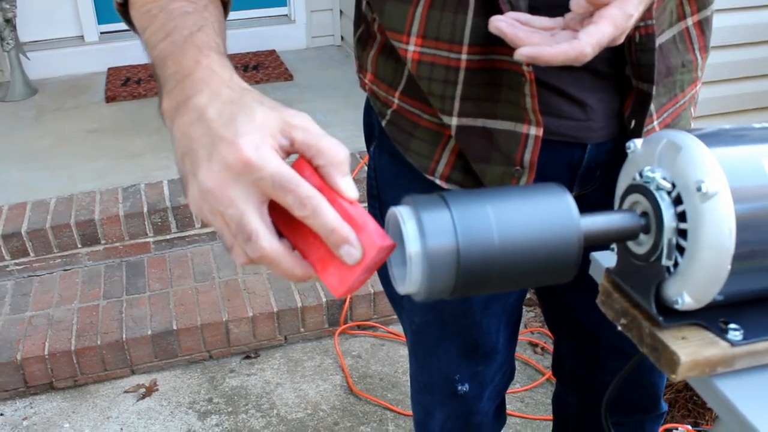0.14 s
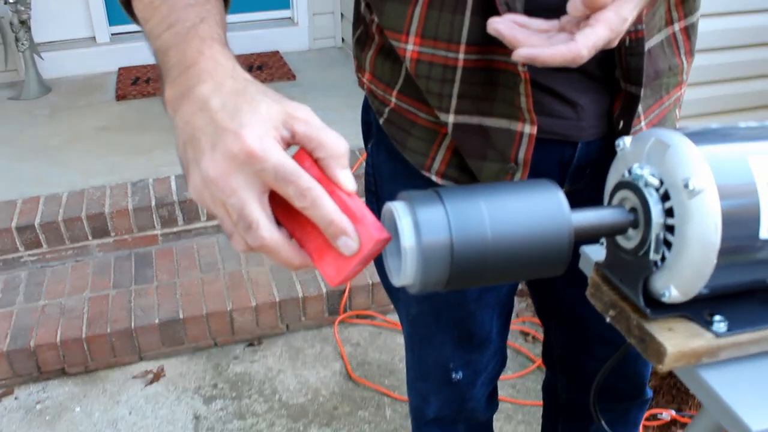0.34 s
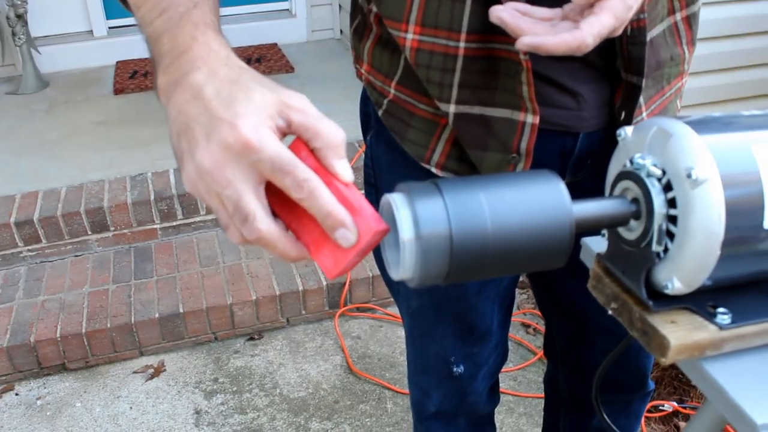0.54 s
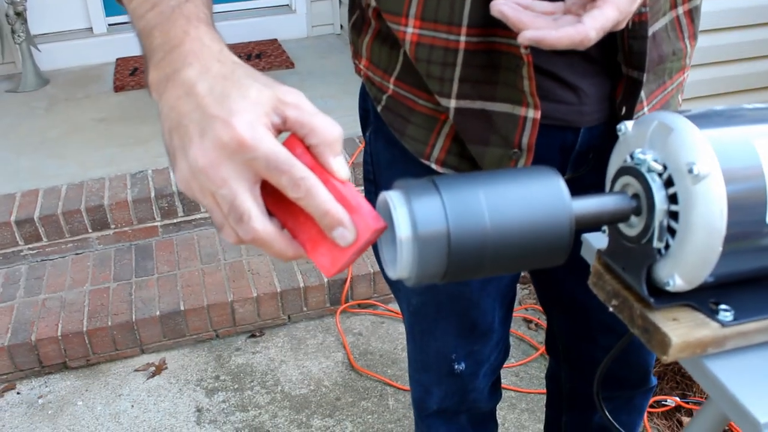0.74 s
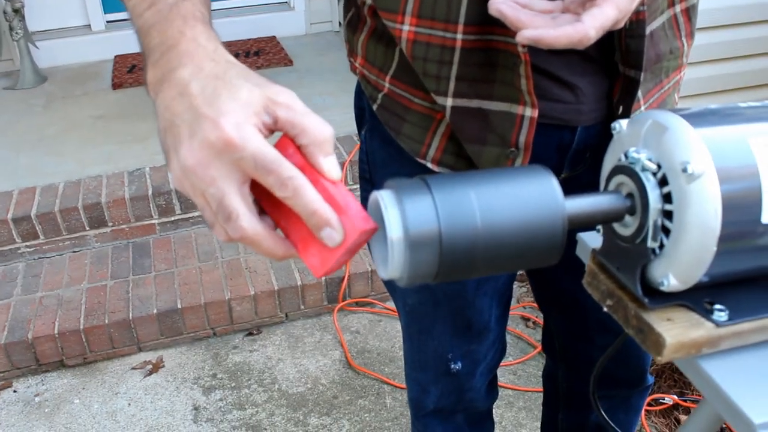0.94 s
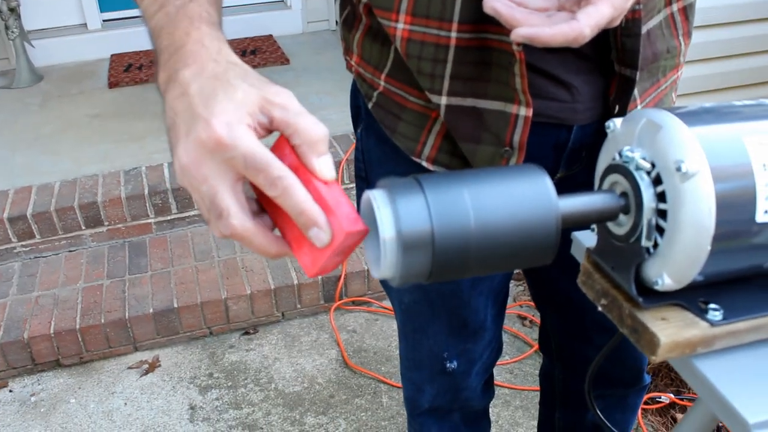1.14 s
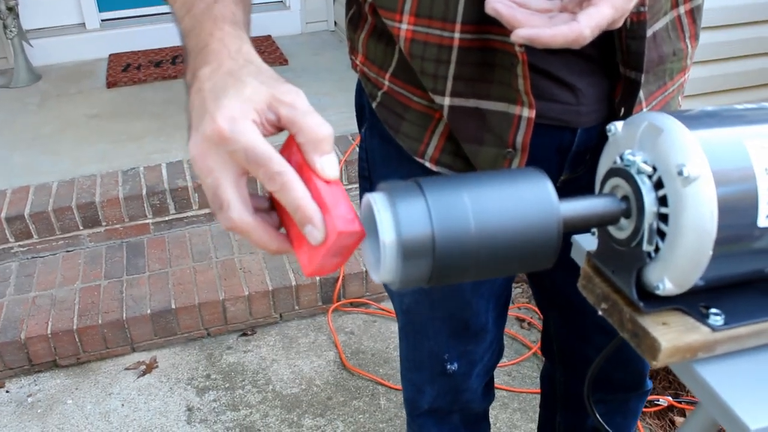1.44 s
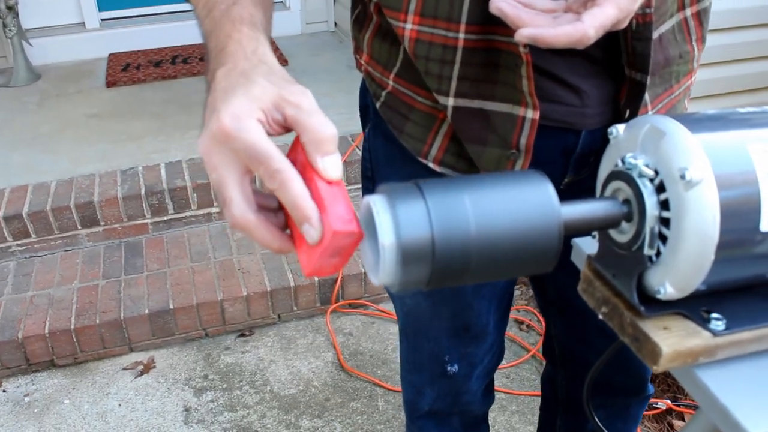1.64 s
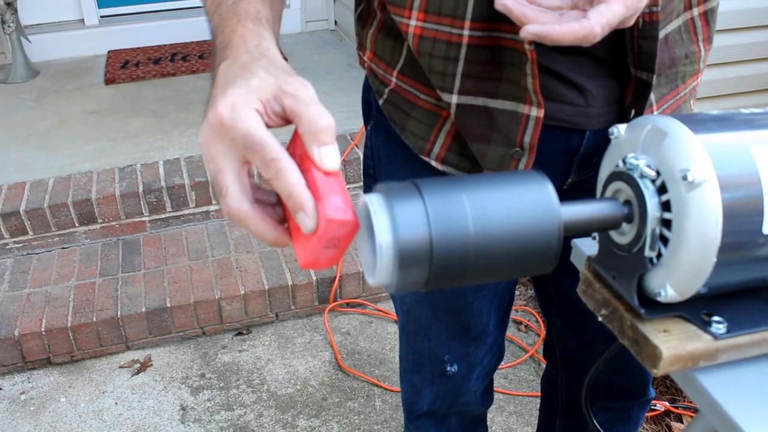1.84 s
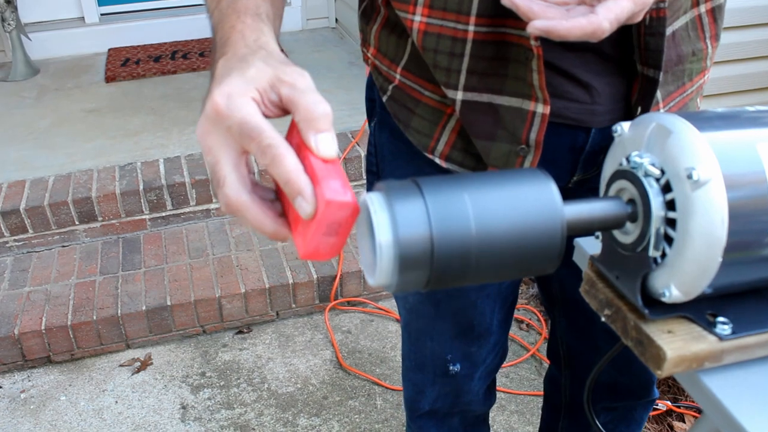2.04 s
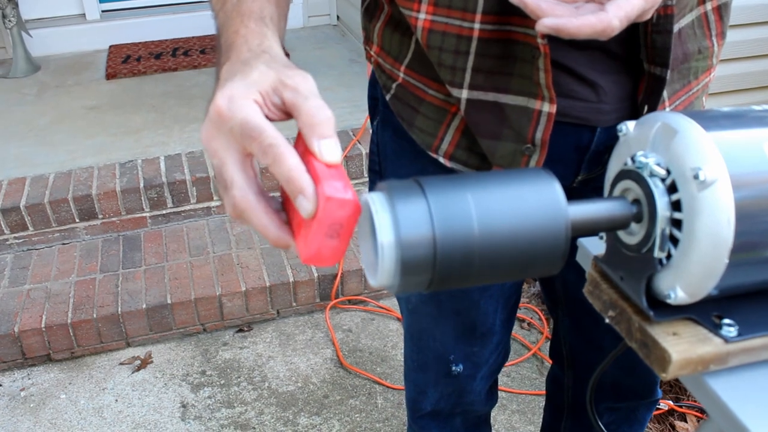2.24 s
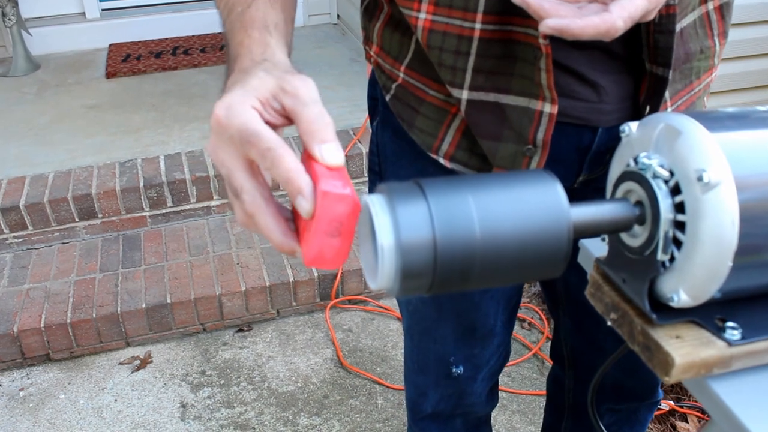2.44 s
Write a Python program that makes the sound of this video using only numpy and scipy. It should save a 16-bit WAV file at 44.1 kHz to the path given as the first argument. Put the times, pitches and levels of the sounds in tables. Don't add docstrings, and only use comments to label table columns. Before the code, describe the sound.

A wet abrasive pad grinds continuously on a spinning glass bottle rim, a bright gritty hiss pulsing about thirty times a second, with small ticks, catches and faint motor hum, close outdoors, one microphone.

```python
import sys
import numpy as np
from scipy import signal
from scipy.fft import rfft, irfft
from scipy.io import wavfile

SR = 44100
rng = np.random.default_rng(int(sys.argv[2]) if len(sys.argv) > 2 else 0)


def file_out(sig):
    cols = np.atleast_2d(sig).T
    lim = np.clip(cols, -1, 1)
    pcm = np.round(lim * 32767).astype(np.int16)
    wavfile.write(sys.argv[1], SR, pcm)


def linear_from_db(decibels):
    return 10 ** (np.asarray(decibels, float) / 20)


N = 114660

# multiple of the turn, level in dB before the pad tilts, level in dB after.
HUM = [(3, -67, -54), (4, -66, -69), (5, -61, -60.5), (6, -48, -60), (8, -65, -52), (10, -50, -48),
       (16, -43.5, -40.5)]
# start in seconds, level in dB.
KNOCKS = [
    (2.4215, -11),
    (2.5555, -15),
]
# start in seconds, low ring in dB, high ring in dB.
TICKS = [(0.0682, -16, -20), (0.0997, -16, -18), (0.1331, -19, -22), (0.167, -20, -22), (0.1999, -18, -22),
         (0.3132, -19, -22), (0.377, -20, -19), (0.41, -17, -17), (0.4444, -17, -18), (0.4778, -20, -21),
         (0.5107, -17, -20), (0.6454, -11, -14), (0.6784, -17, -19), (0.7108, -17, -20), (0.7457, -14, -17),
         (0.7791, -13, -17), (0.8126, -15, -18), (0.846, -16, -21), (0.8799, -14, -21), (0.9128, -14, -18),
         (0.9467, -15, -18), (0.9772, -21, -20), (1.0026, -21, -21), (1.0809, -16, -16), (1.1139, -17, -15),
         (1.1458, -20, -15), (1.1817, -18, -15), (1.2111, -18, -17), (1.3154, -17, -15), (1.3478, -15, -17),
         (1.3798, -16, -19), (1.5584, -16, -21), (1.6147, -16, -22), (1.6806, -16, -22), (1.7135, -14, -21),
         (1.8502, -21, -23), (1.9794, -20, -27), (2.0123, -17, -26), (2.0792, -20, -25), (2.2189, -20, -22),
         (2.2493, -20, -23), (2.4448, -16, -24), (2.4823, -16, -26), (2.5561, -21, -24)]
# pitch in Hz, level in dB, decay by 60 dB in seconds.
CHIP_LOW = [(2430, 1.5, .02), (2850, -5, .012)]
# pitch in Hz, level in dB, decay by 60 dB in seconds.
CHIP_HIGH = [(3490, -3, .03), (4024, 0, .025), (4400, 0, .03), (5830, -6, .017)]
# start in seconds, level in dB.
THUMPS = [(0.029, -34), (0.052, -31), (0.144, -22), (0.183, -17.5), (0.243, -19.5), (0.278, -19),
          (0.312, -20.5), (0.348, -23), (0.38, -23), (0.447, -23), (0.523, -22.5), (0.638, -35),
          (0.686, -18.5), (0.72, -18), (0.754, -15), (0.788, -14.5), (0.821, -18), (0.854, -23),
          (0.89, -24.5), (1.039, -18.5), (1.079, -21), (1.25, -20), (1.316, -25.5), (1.35, -25),
          (1.389, -19), (1.447, -29), (1.591, -23.5), (1.625, -16), (1.657, -20.5), (1.691, -21.5),
          (1.762, -27), (1.933, -30), (2.091, -21), (2.132, -32), (2.423, -13.5), (2.558, -21)]
# time in seconds, level in dB.
COVER = [(0.0, -28.5), (0.4, -28), (0.69, -27), (0.76, -29.5), (1.45, -31.5), (1.76, -30), (1.92, -32.5),
         (2.6, -42)]
# time in seconds, pitch in Hz, level in dB.
NECK = [(0, 1680, -35), (.12, 1720, -34), (.45, 1710, -38.5), (.63, 1650, -30.5), (.78, 1590, -34.5),
        (.95, 1610, -35.5), (1.2, 1650, -33), (1.36, 1660, -38.5), (1.48, 1640, -28.5), (1.57, 1660, -41),
        (1.9, 1640, -40), (1.93, 1640, -33), (1.96, 1640, -41), (2.25, 1680, -36.5), (2.6, 1670, -47)]
# centre in Hz, width in Hz, level in dB.
AIR = [(292, 31, -15.5), (464, 175, -14.5), (656.7, 98, -5), (1680, 200, -10)]
# frequency in Hz, level in dB per Hz.
AIR_FLOOR = [(40, -87), (100, -36), (250, -24.5), (600, -14.5), (800, -21.5), (1200, -19.5), (2200, -18.5),
             (4000, -30.5)]
# centre in Hz, width in Hz, level in dB.
WALL = [(5796, 67, 7.5), (6025, 50, 8.5), (6083, 180, 4.5)]
# frequency in Hz, level in dB per Hz.
FINE = [(2500, -43), (5500, -28), (7500, -1.5), (9000, -10.5), (10000, -16), (11700, -16), (14000, -10),
        (16000, -40)]
# centre in Hz, width in Hz, level in dB.
FINE_GLASS = [(6880, 140, 0.5), (7260, 110, -17), (8250, 165, 3.5), (9130, 170, -1.5), (10480, 710, -8.5),
              (12600, 180, 2.5), (13110, 215, 5), (13960, 410, -11), (14640, 400, -4)]
# centre in Hz, width in Hz, level in dB.
TOP_GLASS = (15620, 260, -1)
# frequency in Hz, level in dB per Hz.
SCRAPE = [(250, -44), (900, -28), (1950, -14), (2800, -6.5), (4000, -1.5), (5300, -8.5), (6500, -26.5),
          (10000, -77)]
# centre in Hz, width in Hz, level in dB.
GLASS = [
    [(2450, 140, -3.5), (2760, 55, -18), (3180, 50, 0.5), (3460, 60, 0.5), (3700, 50, -3), (4040, 26, 9),
     (4364, 83, 5), (4870, 72, 0.5)],
    [(2340, 270, -3), (3160, 120, -2), (3500, 42, -12.5), (4010, 40, 3), (4375, 140, 5)],
    [(2380, 72, -8), (2660, 60, 0), (2960, 60, 2), (3400, 120, -0.5), (4290, 63, 9)],
]
# time in seconds, pressure as scrape level in dB, air-column drive in dB,
# wobble per turn in dB, share of grit repeating 0-1, wall ring in dB, fine-grit share in dB.
HAND = [(0, -24, -25.5, -7, 0.6, -10, -3), (.1, -27.5, -29.5, 6.5, 1, -9.5, -5.5),
        (.2, -28.5, -25.5, 1, 1, -6.5, -2), (.36, -22.5, -26.5, 2, 1, -9.5, -6.5),
        (.45, -22.5, -26, 1.5, 0.95, -6, -4), (.62, -22, -29, 2.5, 1, -2.5, -1.5),
        (.7, -20.5, -32, -1.5, 0.36, -8, -6.5), (.93, -23, -28.5, 2, 1, -6.5, -5),
        (1.2, -24.5, -28, 1, 0.73, -4, -3.5), (1.33, -21, -27, 1, 0.74, 0, -5),
        (1.55, -20.5, -27, 0, 0.9, -8, -7.5), (1.7, -26, -26.5, 1.5, 0, -4, -5),
        (1.76, -28, -25.5, 2.5, 0.04, -7.5, -6), (2.2, -26.5, -27.5, 0, 0.6, -7.5, -6.5),
        (2.45, -27, -27.5, 3, 0.85, -6.5, -8), (2.53, -35, -28, -0.5, 0, -4, -2.5),
        (2.6, -26.5, -26, 4, 0.2, -7, -6)]
# start in seconds, peak in dB, thump of the air column in dB,
# length in seconds.
CATCHES = [(0.058, -6, -5, 0.018), (0.094, -2.5, 1, 0.01), (0.132, -2, -18, 0.0077),
           (0.164, -7, -24, 0.014), (0.195, -4, -11, 0.015), (0.2316, -2.5, -18, 0.019),
           (0.416, -6, -15, 0.013), (0.438, -1.5, -17, 0.014), (0.6326, 0.5, -7, 0.019),
           (0.766, -4, -20, 0.023), (1.04, 0, -16, 0.008), (1.173, -0.5, -32, 0.01), (1.21, -18, 8, 0.0092),
           (1.347, 5, -17, 0.0057), (1.679, -8.5, 1, 0.014), (2.213, -4.5, 1.5, 0.0088),
           (2.258, -1, 1, 0.0054), (2.278, -4.5, -0.5, 0.011), (2.44, -11, 2, 0.011),
           (2.547, -7, -8, 0.0092), (2.588, -13, -4, 0.0073)]

TURN_HZ = 29.878
TILT_S, TILT_TAKES_S = 1.6, 0.13
HIGH_SPOT_TURN, AIR_SPOT_TURN = 0.22, 0.42
FLUTTER_DB, FLUTTER_HZ = 0.8, 14


def drift(rate_hz):
    r = np.exp(-80 * np.pi * rate_hz / SR)
    slow = signal.lfilter([1], [1, -2 * r, r * r], rng.standard_normal(N // 40 + 2002))[2000:]
    return np.interp(np.arange(N) / 40, np.arange(len(slow)), rms_one(slow))


def rms_one(x):
    return x / np.sqrt(np.mean(x ** 2) + 1e-20)


def columns(rows):
    s, *rest = np.transpose(rows)
    return [np.interp(np.arange(N) / SR, s, c) for c in rest]


def body(x, modes, floor):
    size = 2 ** 13
    hz = np.arange(1, size // 2 + 2) * SR / size
    floor_hz, floor_db = np.transpose(floor)
    power = linear_from_db(2 * np.interp(np.log(hz), np.log(floor_hz), floor_db))
    for centre_hz, width_hz, db in modes:
        detune = (hz - centre_hz ** 2 / hz) / width_hz
        power = power + linear_from_db(2 * db) / (1 + detune ** 2) ** 1.31
    cepstrum = irfft(np.log(power) / 2)
    cepstrum[1:size // 2] *= 2
    cepstrum[size // 2 + 1:] = 0
    response = irfft(np.exp(rfft(cepstrum)))
    return signal.fftconvolve(x, response / np.sqrt(np.sum(response ** 2)))[:N]


def sung(hz, width_hz):
    evenness = 0.85
    wander = drift(width_hz) + 1j * drift(width_hz)
    steadied = wander / (np.abs(wander) + 0.1) ** evenness
    ring = steadied * np.exp(2j * np.pi * np.cumsum(hz * np.ones(N)) / SR)
    return rms_one(ring.real)


def strike(starts_s, levels_db, modes):
    at = (np.array(starts_s) * SR).astype(int)
    out = np.zeros(N)
    for hz, db, t60 in modes:
        hits = np.zeros(N)
        hits[at] = linear_from_db(levels_db + db + rng.standard_normal(len(at)))
        r, w = linear_from_db(-60 / (t60 * SR)), 2 * np.pi * hz / SR
        soft = np.hanning(round(4 * SR / hz))
        push = np.convolve(hits, soft * np.cos(w * np.arange(len(soft))) * 2 / soft.sum())[:N]
        out += signal.lfilter([0, np.sin(w)], [1, -2 * r * np.cos(w), r * r], push + 1e-18)
    return out


def tilted():
    return np.clip((np.arange(N) / SR - TILT_S) / TILT_TAKES_S, 0, 1)


def bench():
    before_db, after_db = -54, -47.5
    colour = [(30, -13), (90, -3), (200, 3), (400, -18.5)]   # Hz, dB per Hz
    return linear_from_db(before_db + (after_db - before_db) * tilted()) * body(rng.standard_normal(N), [], colour)


def shaft():
    t, after = np.arange(N) / SR, tilted()
    hum = np.zeros(N)
    for multiple, before_db, after_db in HUM:
        level_db = before_db + (after_db - before_db) * after + 0.8 * drift(4.1)
        hum += np.sqrt(2) * linear_from_db(level_db) * np.sin(2 * np.pi * (multiple * TURN_HZ * t + rng.random()))
    return hum


def knocks():
    starts_s, levels_db = np.transpose(KNOCKS)
    modes = [(649, -17.5, 0.08), (1640, -9.5, 0.081), (1770, -3, 0.04), (4530, -14, 0.022), (6160, -12, 0.061)]
    return strike(starts_s, levels_db, modes)


def chip_ticks():
    starts_s, low_db, high_db = np.transpose(TICKS)
    return strike(starts_s, low_db, CHIP_LOW) + strike(starts_s, high_db, CHIP_HIGH)


def grit(grainy):
    grains_per_s, spread_db = 4000, 3.5
    cracks = rng.random(N) < grains_per_s / SR
    sizes = linear_from_db(spread_db * np.minimum(rng.exponential(1, N), 5))
    grains = cracks * sizes * rng.choice([-1, 1], N)
    share = 0.45 * grainy
    return np.sqrt(share) * rms_one(grains) + np.sqrt(1 - share) * rng.standard_normal(N)


def rim(repeat, grainy=1):
    memory, memory_hz = 0.8, 7000
    turn = round(SR / TURN_HZ)
    worn, fresh = grit(grainy), grit(grainy)
    for i in range(turn, N, turn):
        part = worn[i:i + turn]
        worn[i:i + turn] = memory * worn[i - turn:i][:len(part)] + np.sqrt(1 - memory ** 2) * part
    low = signal.butter(1, memory_hz, fs=SR, output="sos")
    swap = np.sqrt(repeat) * worn - (1 - np.sqrt(1 - repeat)) * fresh
    return fresh + signal.sosfilt(low, swap)


def throb(depth_db, spot_turn):
    squareness, second_spot = 1.7, 0.067
    angle = 2 * np.pi * (TURN_HZ * np.arange(N) / SR - spot_turn)
    shape = np.tanh(squareness * np.cos(angle)) + second_spot * np.sin(2 * angle)
    return linear_from_db(depth_db * shape + 1.0 * drift(18))


def catches(levels_db):
    attack_s, trim_db = 0.0037, -16.5
    since, power = np.arange(SR // 20) / SR, np.zeros(N + SR)
    for (start_s, _, _, length_s), db in zip(CATCHES, levels_db):
        swell = (1 - np.exp(-since / attack_s)) * np.exp(-(since / length_s) ** 2)
        power[int(start_s * SR):][:len(since)] += linear_from_db(2 * (db + trim_db)) * swell
    return power[:N]


def air_column():
    rise_s, fall_s, thump_db = 0.006, 0.0065, 4
    since, power = np.arange(SR // 10) / SR, np.zeros(N + SR)
    swell = (1 - np.exp(-since / rise_s)) * np.exp(-since / fall_s)
    for start_s, db in THUMPS:
        power[int(start_s * SR):][:len(since)] += linear_from_db(2 * (db + thump_db)) * swell ** 2
    cover_db = columns(COVER)[0] - 3
    column = np.sqrt(linear_from_db(2 * cover_db) + 4 * power[:N]) * sung(655, 26)
    neck_hz, neck_db = columns(NECK)
    neck = linear_from_db(neck_db) * throb(4, AIR_SPOT_TURN) * sung(neck_hz, 70)
    return column + neck


def air_puffs(air_db, wobble_db, repeat):
    _, peak_db, thump_db, _ = np.transpose(CATCHES)
    steady = linear_from_db(air_db) * throb(0.33 * wobble_db, AIR_SPOT_TURN)
    drive = np.sqrt(steady ** 2 + catches(peak_db + thump_db - 3))
    return body(drive * rim(0.5 * repeat), AIR, AIR_FLOOR)


def wall_ring(eased, wall_db, repeat):
    drive = linear_from_db(wall_db + FLUTTER_DB * drift(FLUTTER_HZ)) * eased
    return body(drive * rim(0.14 * repeat), WALL, [(100, -21), (20000, -73)])


def fine_scrape(eased, fine_db, repeat):
    drive = linear_from_db(fine_db + FLUTTER_DB * drift(FLUTTER_HZ)) * eased
    return body(drive * rim(0.5 * repeat, grainy=0.35), FINE_GLASS + [TOP_GLASS], FINE)


def grip(scrape):
    t = np.arange(N) / SR
    shifts_s = (0.655, 1.72)
    past = [1, *(np.clip((t - s) / TILT_TAKES_S + 0.5, 0, 1) for s in shifts_s), 0]
    return sum(body((past[k] - past[k + 1]) * scrape, modes, SCRAPE) for k, modes in enumerate(GLASS))


def bottle():
    level_db, air_db, wobble_db, repeat, wall_db, fine_db = columns(HAND)
    repeat, wobble_db = np.clip(repeat, 0, 1), np.maximum(wobble_db, 0)
    held = linear_from_db(level_db)
    press = np.sqrt((held * throb(wobble_db, HIGH_SPOT_TURN)) ** 2 + catches(np.array(CATCHES)[:, 1]))
    eased = held * (press / held) ** 0.55
    air = air_puffs(air_db, wobble_db, repeat) + air_column()
    glass = wall_ring(eased, wall_db, repeat) + fine_scrape(eased, fine_db, repeat)
    return chip_ticks() + air + glass + grip(press * rim(repeat))


def scene():
    return np.tile(bench() + shaft() + knocks() + bottle(), (2, 1))


def low_pass(x):
    return signal.sosfilt(signal.butter(12, 17060, fs=SR, output="sos"), x)


def record(dry):
    low_cut = signal.butter(2, 37, "high", fs=SR, output="sos")
    top_cut = signal.ellip(12, 0.5, 80, 15740, fs=SR, output="sos")
    return low_pass(signal.sosfilt(np.vstack([low_cut, top_cut]), dry))


dry = scene()
out = record(dry)
file_out(out)
```